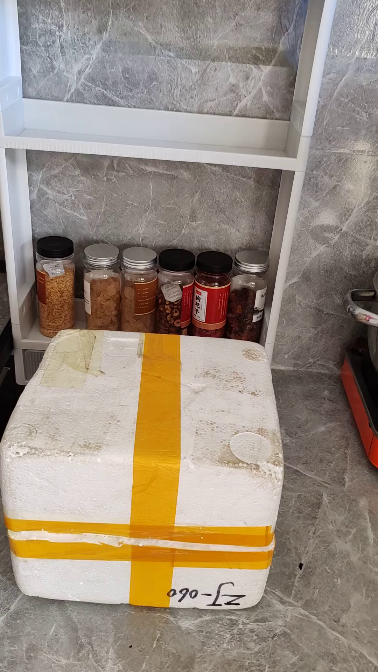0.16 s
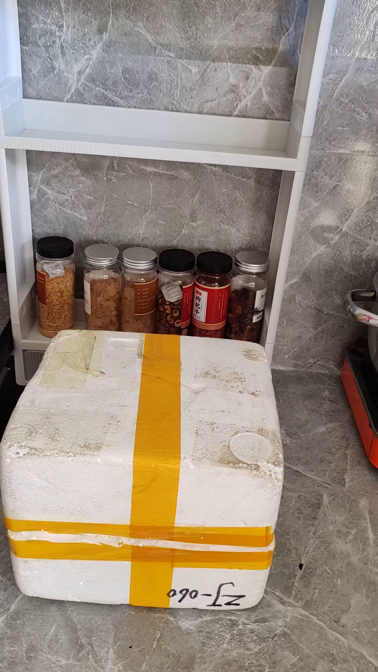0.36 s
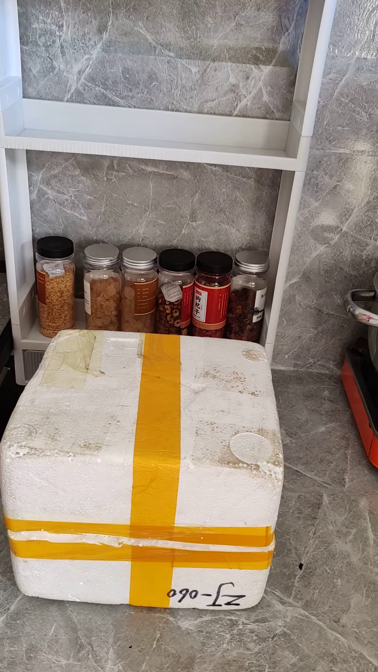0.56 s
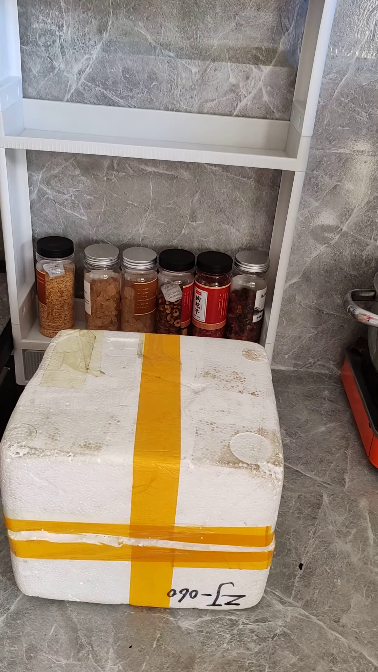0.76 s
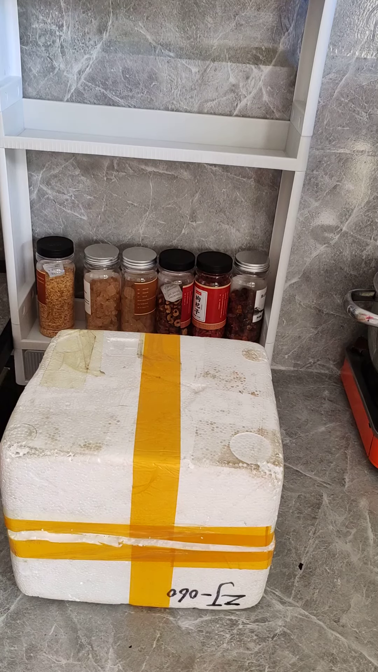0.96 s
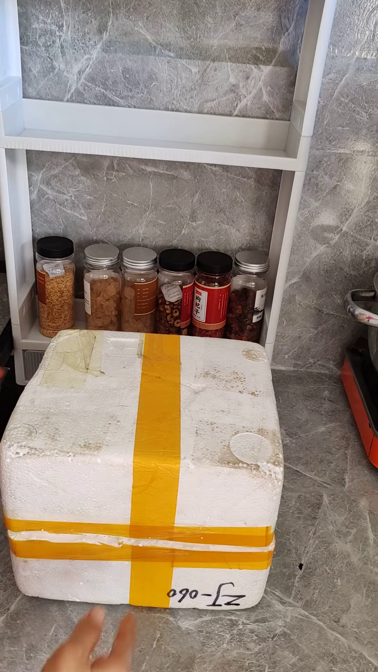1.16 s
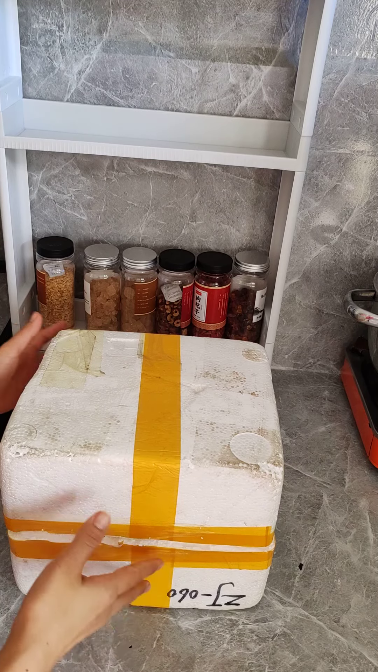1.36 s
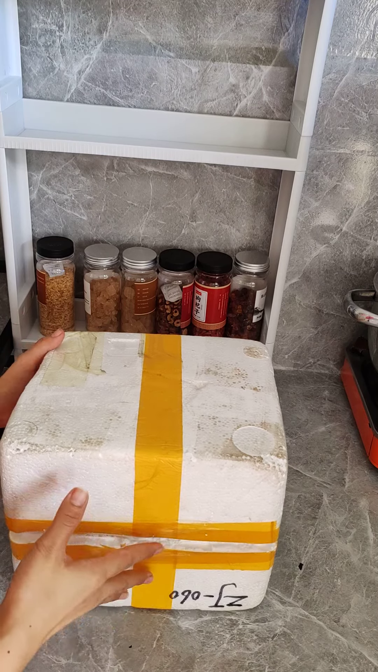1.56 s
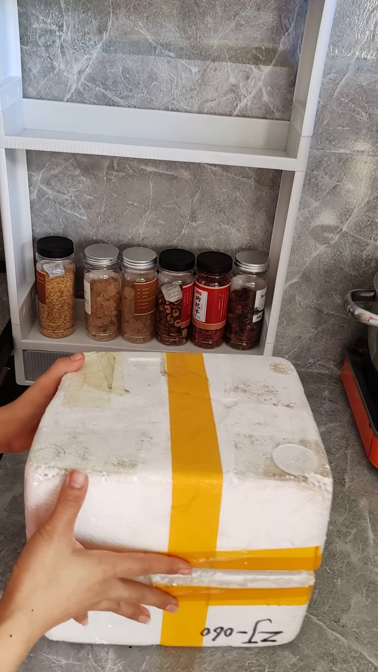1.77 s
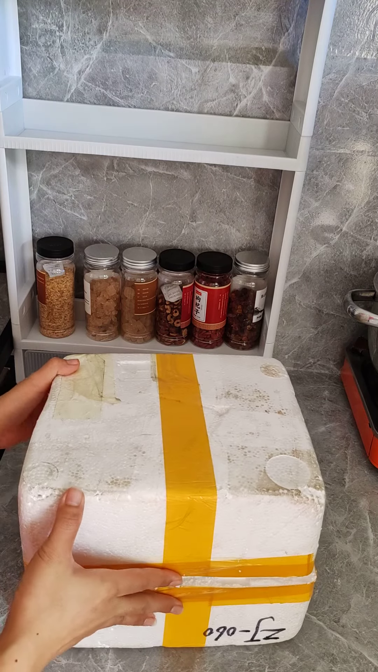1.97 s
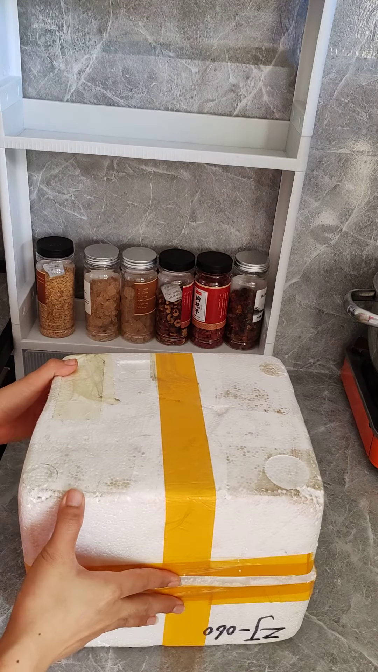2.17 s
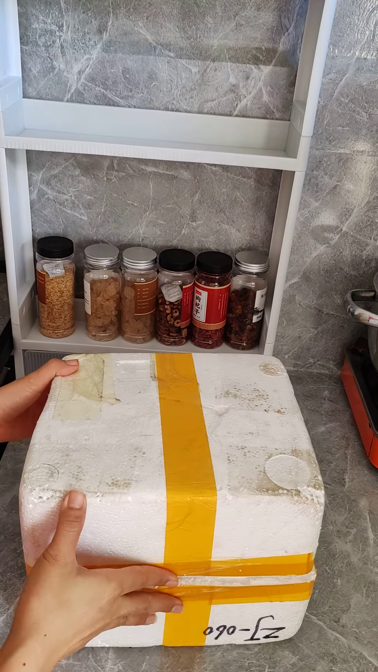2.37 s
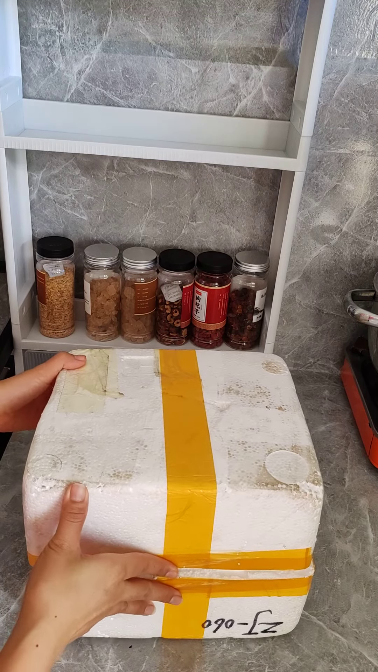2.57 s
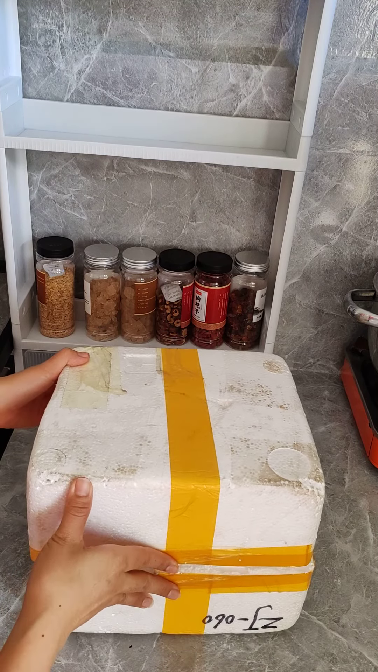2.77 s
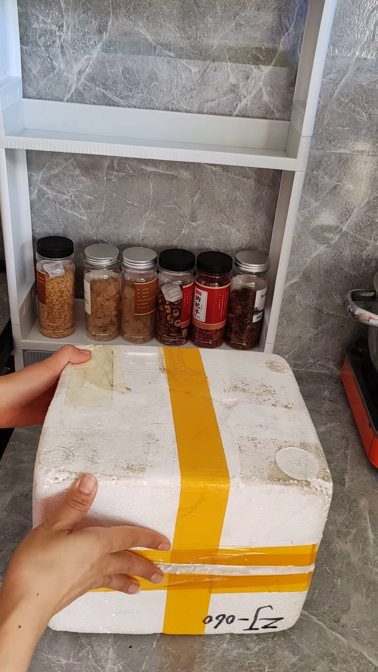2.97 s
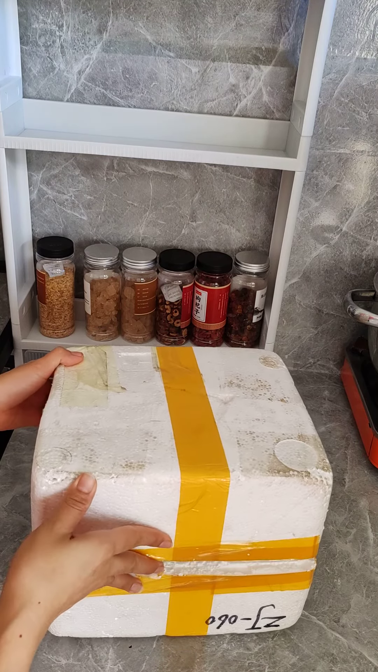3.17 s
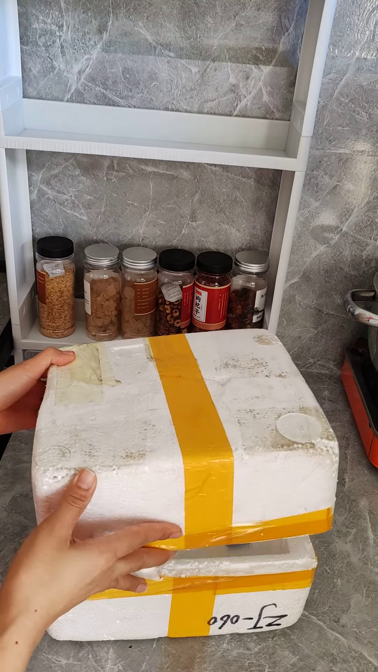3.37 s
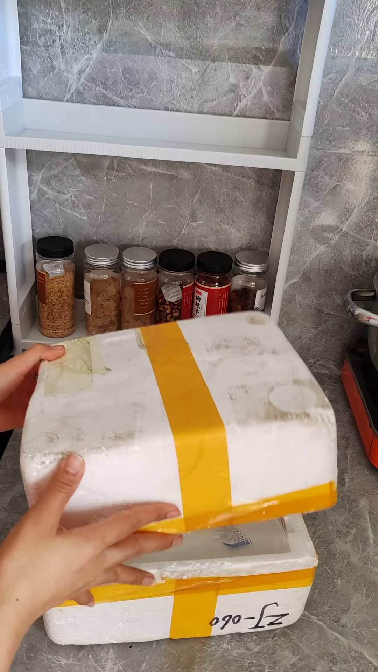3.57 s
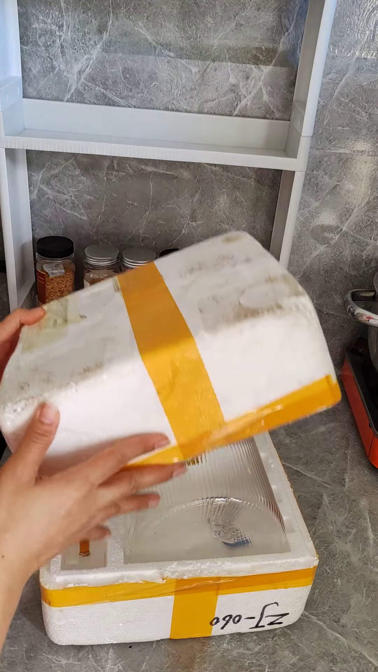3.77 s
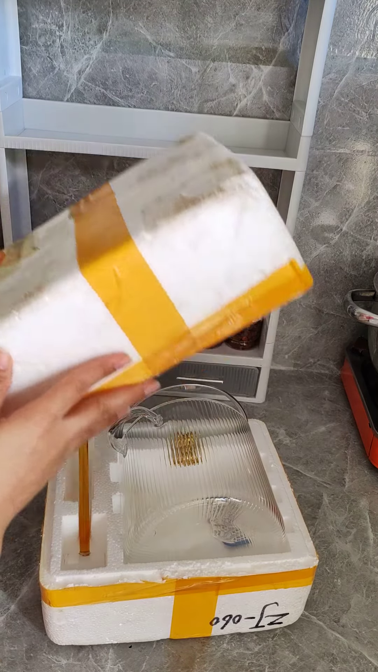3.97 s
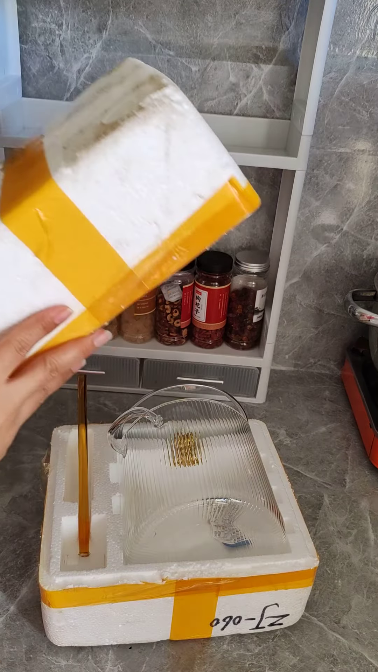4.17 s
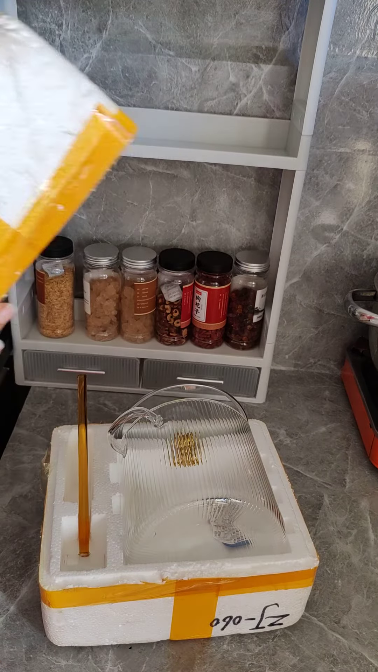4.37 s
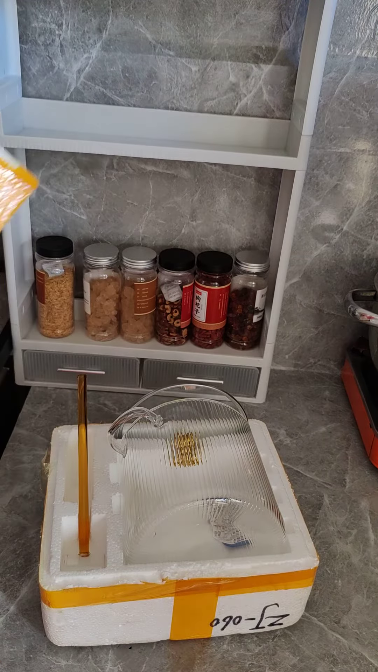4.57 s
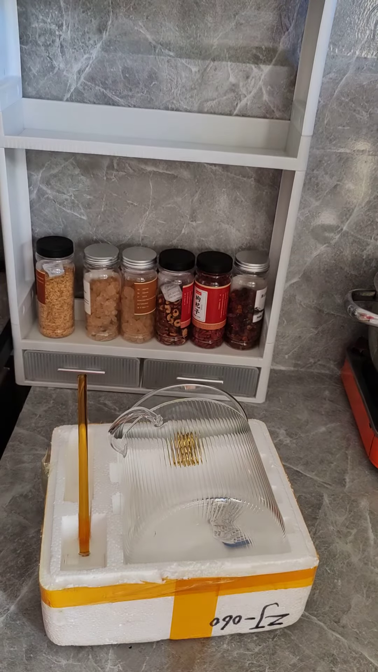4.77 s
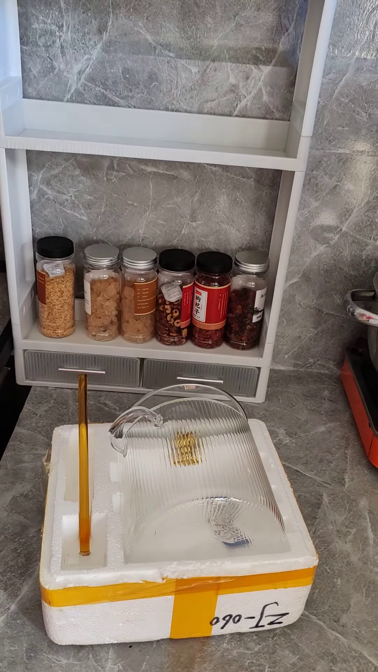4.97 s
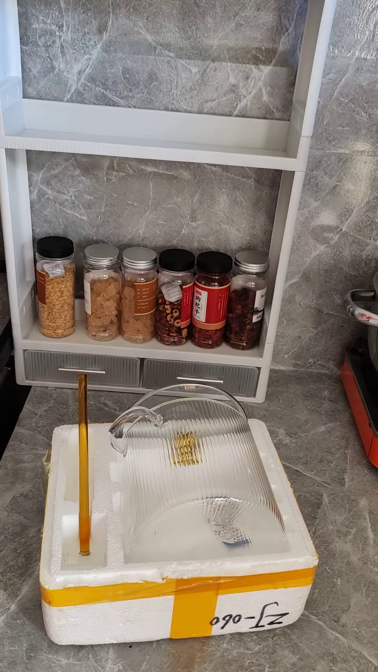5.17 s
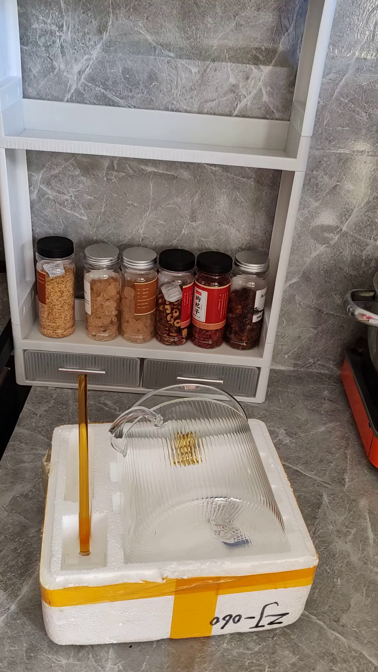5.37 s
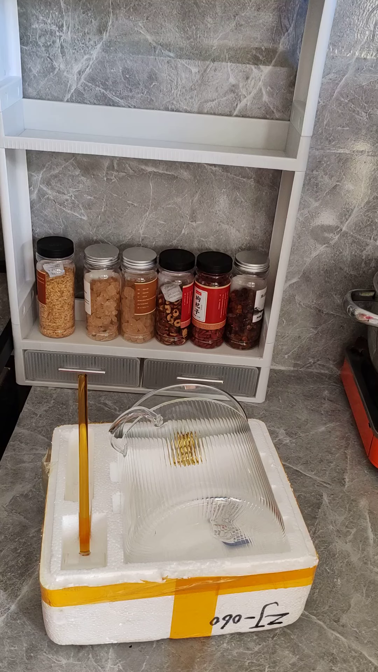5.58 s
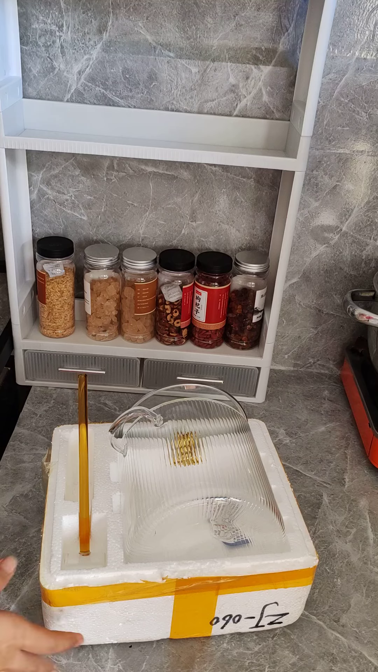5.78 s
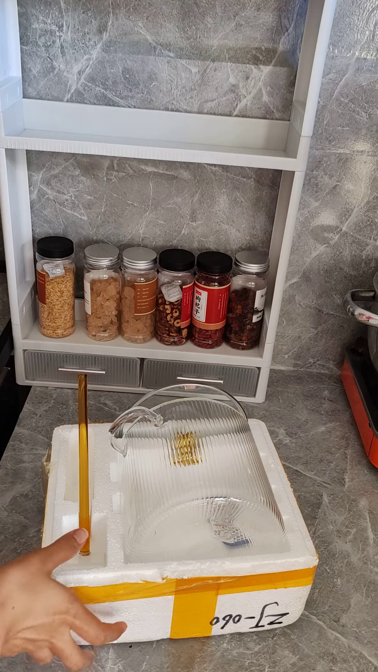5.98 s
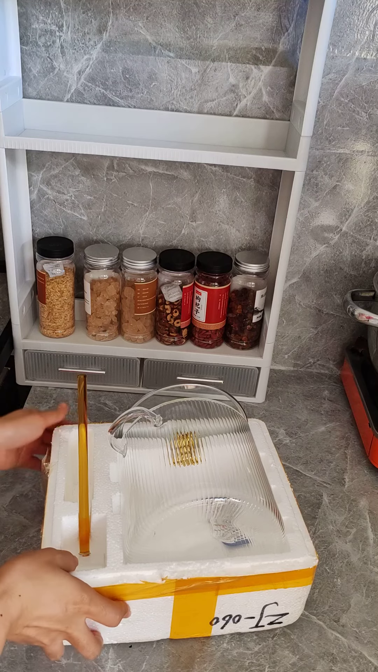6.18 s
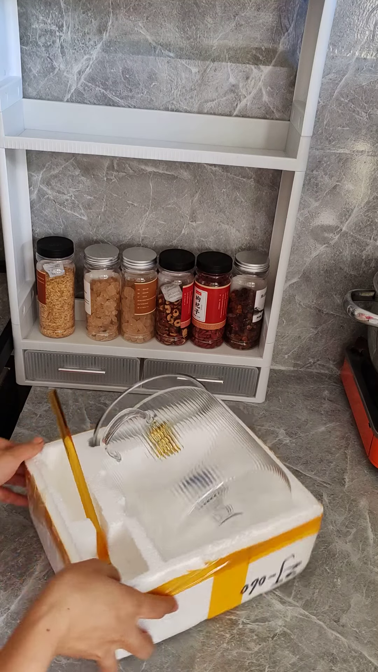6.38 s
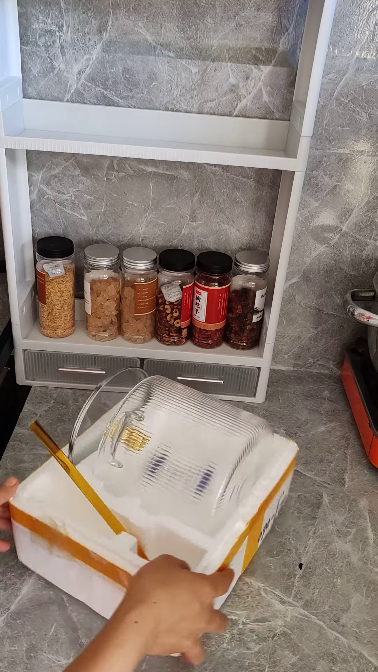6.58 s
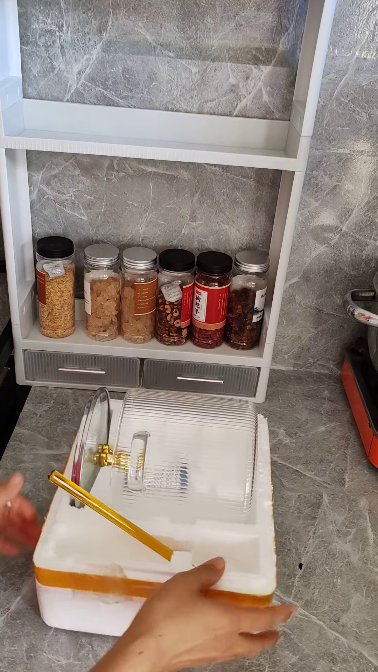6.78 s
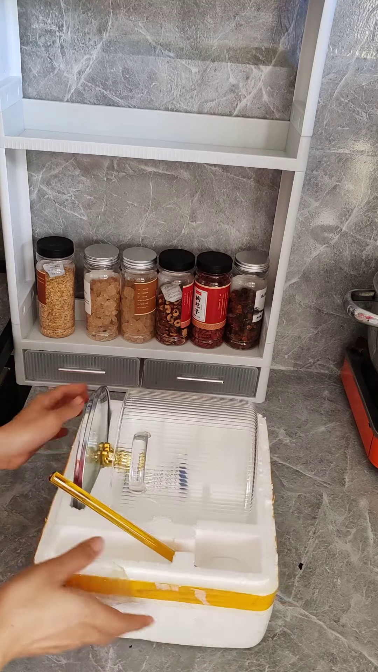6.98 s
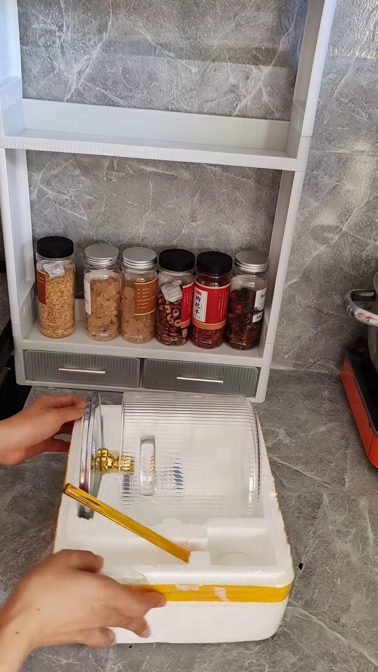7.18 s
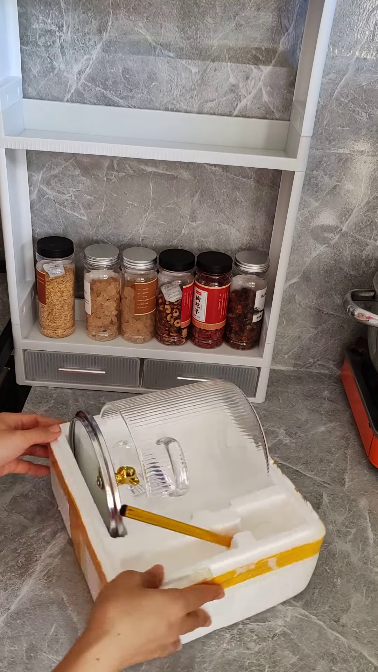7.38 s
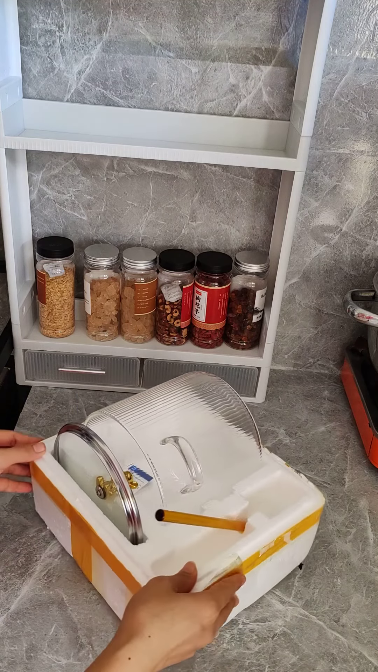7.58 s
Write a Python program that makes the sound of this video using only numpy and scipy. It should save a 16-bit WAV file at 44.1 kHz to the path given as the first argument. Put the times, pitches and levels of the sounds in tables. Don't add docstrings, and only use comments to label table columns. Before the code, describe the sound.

Close in a hard-walled kitchen, faint sleeve rustle comes before hands grip a foam box. It thumps, scrapes and judders on the stone counter while tape ticks. The tight lid rubs loose with short squeaks and one sharp, chattering high squeal. Light brushes follow, the lid lands a little further off, then the base is turned with gritty scraping and low creaks. A phone microphone catches low room rumble beneath.

```python
import sys
import numpy as np
from scipy import signal
from scipy.fft import rfft, irfft, next_fast_len
from scipy.io import wavfile
from scipy.ndimage import uniform_filter1d, map_coordinates

SR = 44100
rng = np.random.default_rng(int(sys.argv[2]) if len(sys.argv) > 2 else 0)


def voltage_ratio(decibels):
    exponent = np.asarray(decibels, float) / 20
    return 10 ** exponent


def digitize_waveform(pressure):
    field = np.atleast_2d(pressure).T
    bounded = np.clip(field, -1, 1)
    quanta = np.round(bounded * 32767).astype(np.int16)
    wavfile.write(sys.argv[1], SR, quanta)


N = 336483
TOP_HZ = 15950


def unit(x):
    return x / np.sqrt(np.mean(x ** 2) + 1e-20)


def along(points, hz):
    f, v = np.transpose(points)
    return np.interp(np.log(hz + 1), np.log(f + 1), v)


def filtered(x, response):
    m = next_fast_len(x.shape[-1] + 8192)
    return irfft(rfft(x, m) * response(np.fft.rfftfreq(m, 1 / SR)), m)[..., :x.shape[-1]]


def resonant(modes):
    def response(f):
        return sum((-1) ** k * voltage_ratio(db) * 1j * f * width / (centre * centre - f * f + 1j * f * width)
                   for k, (centre, width, db) in enumerate(modes))
    return response


def wobble(rate, size=N):
    knots = rng.standard_normal(int(size / SR * rate * 1.1) + 9)
    return map_coordinates(knots, [np.arange(size) * rate / SR])


def add(track, s, sound):
    part = track[..., round(s * SR):][..., :sound.shape[-1]]
    part += sound[..., :part.shape[-1]]


def swell(length):
    u = np.linspace(0, 1, round(length * SR))
    return u, np.sin(np.pi * u ** 0.6) ** 0.42


def glide(u, first_hz, last_hz, unsteady):
    return np.cumsum((first_hz + (last_hz - first_hz) * u) * (1 + unsteady)) / SR


def apart(pair, lag):
    return filtered(pair, lambda hz: np.exp(1j * np.pi * hz * lag * np.array([[-1], [1]])))


# f/Hz, left-right correlation
ALIKE = [(60, 0.92), (180, 0.9), (400, 0.92), (700, 0.18), (1650, 0.1), (5000, 0.088), (15000, 0.062)]


def paired(pair, colour):
    def response(hz):
        alike = along(ALIKE, hz) * [[1], [-1]]
        return voltage_ratio(along(colour, hz)) * np.sqrt((1 + alike) / 2)
    mid, side = filtered(pair, response)
    return np.array([mid + side, mid - side])


def rush(spectrum, grain=1, patchy_db=2, size=N):
    z = signal.stft(grain * rng.standard_normal((2, size)), nperseg=1024)[2]
    field = uniform_filter1d(rng.standard_normal(z.shape[1:]), size=4, axis=0)
    field = uniform_filter1d(field, size=10, axis=1)
    patchy = signal.istft(z * voltage_ratio(patchy_db * unit(field)), nperseg=1024)[1][:, :size]
    return unit(paired(patchy, spectrum))


def stroked(rows, layers, haste=1):
    power = np.zeros((len(layers), N))
    over_db, slope, release = np.transpose(layers)[..., None]
    for s, rise, hold, db, bright_db in rows:
        t = np.arange(round((rise + hold + .5) * SR)) / SR
        fall_db = haste * release * np.clip(t - rise - hold, 0, None)
        attack = np.clip(t / rise, 0, 1) ** 2.2
        add(power, s, attack * voltage_ratio(2 * (db + over_db + slope * bright_db - fall_db)))
    return power


# f/Hz, level/dB per Hz
DEEP = [(22, -53), (32, -25), (42, 0), (50, -2.5), (62, -9.5), (80, -15.5), (110, -18), (200, -120)]
AIR = [(50, -37), (133, -5), (185, -11.5), (269, -4.5), (340, -13), (1200, -19.5), (6460, -48),
       (19800, -120)]
# t/s, half length/s, level/dB
SURGES = [(0.347, 0.27, -53), (0.766, 0.06, -52), (1.035, 0.13, -51), (1.79, 0.55, -53),
          (2.25, 0.26, -43.5), (2.62, 0.14, -47), (2.998, 0.087, -45.5), (3.303, 0.22, -55.5),
          (3.914, 0.039, -55), (4.243, 0.075, -49), (4.804, 0.13, -49), (5.165, 0.054, -52),
          (5.374, 0.037, -47.5), (5.624, 0.084, -40), (5.866, 0.056, -41.5), (6.09, 0.057, -45),
          (6.457, 0.17, -46), (6.893, 0.41, -48.5), (7.55, 0.091, -44.5)]


def house():
    calm_db, air_db = -62, -56.5
    t = np.linspace(0, N / SR, 2000)
    power = voltage_ratio(calm_db) ** 2
    power = power + sum(voltage_ratio(db) ** 2 * np.exp(-((t - s) / half) ** 2) for s, half, db in SURGES)
    surge = np.interp(np.arange(N) / SR, t, np.sqrt(power))
    return apart(surge * rush(DEEP) + voltage_ratio(air_db) * rush(AIR), lag=0.00035)


# f/Hz, t60/s
KITCHEN = [(200, 0.58), (1000, 0.47), (4000, 0.71), (12000, 0.31)]


def kitchen(x):
    hz, t, z = signal.stft(rng.standard_normal((2, SR)), SR, nperseg=256)
    decay = voltage_ratio(-60 * t / along(KITCHEN, hz)[:, None])
    tail = paired(signal.istft(z * decay, SR, nperseg=256)[1], [(100, 0)])
    tail = tail * np.clip(np.arange(tail.shape[1]) / SR / 0.0084, 0, 1)
    return signal.fftconvolve(x.mean(0)[None], tail / np.linalg.norm(tail[0]), axes=1)[:, :N]


# t/s, rise/s, hold/s, pressure level/dB, brightness/dB
SLEEVE = [
    (.2, 0.12, 0.049, -58.5, -2.5),
    (.33, 0.033, 0.013, -32, -14),
    (.517, 0.025, 0.0055, -48, -1.5),
    (.68, 0.089, 0.043, -71.5, 1.5),
    (.85, .05, 0.39, -63, -28),
    (1.42, .09, .03, -37, -16),
]
# level/dB, slope/(dB per dB of brightness), release/(dB/s)
CLOTH = [(-.2, 1.7, 108), (.2, 5.5, 54)]
# f/Hz, level/dB per Hz
FOLD = [(710, -40), (1580, -0.5), (2420, -10), (3300, -8), (5200, -15), (11400, -120)]
SWISH = [(3060, -10), (5200, -7), (6650, -1), (7350, -13), (10100, -46), (17200, -120)]


def sleeve():
    early = 2 * SR
    fold, swish = np.sqrt(stroked(SLEEVE, CLOTH)[:, :early])
    cloth = fold * rush(FOLD, size=early) + swish * rush(SWISH, size=early)
    return np.pad(cloth, ((0, 0), (0, N - early)))


# t/s, level/dB, f/Hz, t60/s
THUDS = [(1.585, -34.5, 182, 0.064), (2.008, -15.5, 205, 0.048), (2.058, -36, 127, 0.069),
         (3.218, -32, 285.5, 0.075), (3.499, -43.5, 106, 0.12), (5.489, -32.5, 123, 0.23),
         (5.488, -34.5, 212.5, 0.18), (6.366, -28, 304, 0.037), (7.199, -38, 366, 0.17),
         (7.603, -25.5, 400, 0.16), (5.488, -18.5, 561, 0.068), (2.88, -25, 314, 0.085)]


def thuds():
    out, t = np.zeros(N), np.arange(SR // 4) / SR
    for s, db, hz, t60 in THUDS:
        phase = 2 * np.pi * hz * np.cumsum(1 + 0.063 * wobble(40, size=len(t))) / SR
        add(out, s, voltage_ratio(db - 60 * t / t60) * (1 - np.exp(-t / 0.003)) * np.sin(phase))
    return out


# t/s, peak level/dB, colour f/Hz, broad part level/dB
TAPE = [(0.536, -48, 3240, -26), (1.602, -30.5, 6550, -12), (2.017, -21, 4430, -6),
        (2.253, -20.5, 3270, 12), (3.026, -25, 6550, -6), (3.342, -32.5, 4310, -19),
        (3.7298, -7, 5000, -8.5), (4.145, -40.5, 4290, .6), (4.613, -54, 6500, 0), (3.337, -42, 9000, 0),
        (2.989, -26, 2400, -3), (5.313, -49.5, 3280, -16), (5.415, -18, 3250, -9),
        (6.364, -29, 2030, -13.5), (6.736, -23, 1860, -3), (7.15, -50, 1320, -22), (7.189, -49, 3000, -3),
        (7.31, -29, 6200, -6), (6.19, -52, 3000, 3), (6.258, -52, 13000, -3), (7.335, -21, 1740, -6),
        (7.564, -19, 7600, -3), (1.654, -21.5, 6000, 2), (2.262, -27, 3230, -3), (2.459, -27, 2500, 3),
        (2.885, -26, 4500, 0), (3.513, -30, 900, -8), (1.677, -16, 2010, 3), (5.617, -18.5, 3000, 2),
        (7.322, -15.5, 5660, 1.2)]
# t/s, peak level/dB, colour f/Hz, knock level/dB
TAPS = [(1.579, -31.5, 990, -1.5), (1.586, -29.5, 1070, -3), (2.876, -24.5, 3000, 1.5),
        (2.94, -22, 4100, -8.5), (3.127, -17, 4430, -4), (4.324, -37, 6260, -3.5), (4.401, -35.5, 990, -2),
        (4.45, -38, 1120, -1.5), (4.372, -46, 1200, -4), (4.412, -37, 750, -6), (4.424, -33.5, 800, 3.5),
        (4.436, -34.5, 846, -0.5), (4.959, -37.5, 975, 3), (5.492, -19, 2720, 2.5), (7.198, -40, 1380, -1),
        (7.59, -34, 899, -2.5), (7.601, -14.5, 1680, -8.5)]
# f/Hz, width/Hz, level/dB
BOX = [(398, 370, -3.5), (674, 410, 1), (1100, 100, -3), (1485, 190, -17)]


def ticks():
    snaps, t = np.zeros(N), np.arange(SR // 20) / SR
    events = [(s, db, hz, broad_db, -33) for s, db, hz, broad_db in TAPE]
    events += [(s, db, hz, -11 + 9 * np.log2(hz / 2000), knock_db) for s, db, hz, knock_db in TAPS]
    broad = resonant([(4000, 9000, 0)])
    for s, db, hz, broad_db, knock_db in events:
        crackle = rng.standard_normal(len(t)) * voltage_ratio(-60 * t / .016)
        panel = resonant([(hz, .4 * hz, 0)])
        snap = 1.6 * filtered(crackle, lambda f: panel(f) ** 2)
        snap += voltage_ratio(broad_db) * filtered(crackle, lambda f: broad(f) / (1 + 1j * f / 9000) ** 2)
        knock = filtered(crackle * voltage_ratio(-60 * t / .03), resonant(BOX))
        add(snaps, s, voltage_ratio(db) * snap / np.abs(snap).max())
        add(snaps, s, voltage_ratio(db + knock_db) * knock / np.abs(knock).max())
    return snaps


# t/s, length/s, f/Hz, width/Hz, level/dB
MOANS = [(.95, .2, 2760, 150, -69), (1.262, .02, 4500, 800, -67), (1.468, .04, 3250, 500, -62),
         (1.517, .06, 3150, 500, -60), (.35, .09, 1800, 400, -60), (5.415, .04, 3300, 700, -31),
         (7.148, .03, 1300, 700, -52), (3.34, .02, 4300, 900, -42), (1.843, .04, 2200, 900, -27),
         (2.21, .015, 800, 300, -44), (2.261, .14, 1630, 450, -34), (2.259, .12, 3360, 600, -36),
         (2.34, .07, 620, 200, -43), (2.04, .04, 620, 300, -30), (2.885, .03, 2400, 600, -32),
         (3.005, .13, 2340, 200, -38), (3.379, .035, 12000, 4000, -30), (3.025, .016, 6600, 1200, -31),
         (5.425, .012, 3150, 600, -27), (5.616, .012, 2700, 500, -30), (5.008, .05, 3650, 250, -59),
         (5.02, .05, 2000, 200, -58), (5.43, .05, 1300, 300, -39), (3.72, .2, 10500, 3500, -30),
         (2.884, .028, 4800, 1200, -35), (3.399, .045, 2850, 600, -19), (3.415, .05, 1900, 900, -28),
         (3.485, .07, 2600, 500, -34), (3.745, .12, 4600, 700, -22), (3.81, .13, 3950, 700, -27),
         (3.83, .12, 4650, 900, -31), (4.33, .1, 470, 120, -58), (4.62, .3, 468, 100, -58),
         (4.96, .12, 470, 120, -58), (5.008, .08, 4700, 250, -56), (5.313, .11, 3300, 400, -58),
         (5.315, .1, 4600, 300, -64), (5.315, .1, 2500, 300, -63), (5.425, .06, 1850, 300, -33),
         (5.485, .09, 2550, 250, -33)]


def moans():
    fade_db, attack_s = -10, 0.0012
    out = np.zeros((2, N))
    for s, length, hz, width_hz, db in MOANS:
        t = np.arange(round(length * SR)) / SR
        shape = voltage_ratio(db + fade_db * t / length) * (1 - np.exp(-t / attack_s)) * np.sqrt(1 - t / length)
        for port in out:
            band = sum(wobble(width_hz, size=len(t)) * turn(2 * np.pi * hz * t) for turn in (np.sin, np.cos))
            add(port, s, shape * band)
    return out


# t/s, length/s, burst rate/Hz, first f/Hz, last f/Hz, level/dB
CHATTERS = [
    (3.7295, .013, 250, 4900, 6500, -8),
    (3.7425, .031, 205, 4700, 4500, -12),
]


def chatters():
    out = np.zeros((2, N))
    for s, length, rate, first_hz, last_hz, db in CHATTERS:
        u = np.linspace(0, 1, round(length * SR))
        since = np.cumsum(rate * (1 + .12 * wobble(150, size=len(u)))) / SR % 1
        burst = np.exp(-2.5 * since) * np.clip(12 * since, 0, 1) * np.clip(8 * (1 - u), 0, 1)
        phase = 2 * np.pi * glide(u, first_hz, last_hz, .05 * wobble(900, size=len(u)))
        for port in out:
            strength = voltage_ratio(db + 1.8 * wobble(300, size=len(u))) * burst
            tone = np.sin(phase + .5 * wobble(200, size=len(u))) + voltage_ratio(-14) * np.sin(2 * phase)
            add(port, s, strength * tone)
    return out


# t/s, length/s, first f/Hz, last f/Hz, level/dB
SQUEAKS = [(2.272, 0.015, 1650, 1600, -34), (2.662, .014, 1700, 1800, -33), (2.675, .012, 2050, 2150, -31),
           (3.399, .01, 2750, 2900, -19), (3.41, .012, 3000, 2800, -18), (2.98, .009, 2350, 2400, -25),
           (2.987, .012, 2420, 2440, -13), (3.001, .008, 2400, 2350, -22), (3.011, .014, 2380, 2340, -28),
           (3.027, .013, 2330, 2340, -26), (3.044, .014, 2380, 2330, -30), (3.068, .012, 2400, 2400, -33),
           (3.082, .028, 2340, 2380, -35), (3.711, 0.018, 4350, 4700, -12),
           (3.704, 0.0083, 4100, 4300, -20), (3.773, 0.023, 8100, 7700, -19.5),
           (3.389, 0.015, 5050, 5300, -22), (3.798, .009, 3700, 3720, -15), (3.785, .007, 3900, 5100, -17),
           (3.79, 0.007, 4300, 4800, -18), (3.806, .012, 5100, 8800, -23.5),
           (3.808, 0.017, 4000, 4100, -23), (5.415, .005, 3350, 3258, -17), (5.415, .006, 8300, 8200, -33)]
SQUEALS = [(2.014, .012, 2200, 5500, -26), (3.389, 0.011, 2800, 2610, -21.5),
           (3.397, 0.025, 2750, 2975, -22), (3.661, 0.022, 1243, 1265, -15),
           (3.678, 0.016, 1400, 2040, -21), (3.687, 0.02, 2750, 2850, -11.5),
           (3.379, .008, 4834, 2795, -25), (3.704, 0.01, 3010, 3497, -19.5),
           (3.708, 0.015, 4210, 4700, -22.5), (3.794, 0.011, 3600, 3644, -14.5),
           (3.718, 0.01, 4600, 4760, -21)]


def squeaks():
    port_turn = .6

    def rim(f):
        return f / np.hypot(f, 2200) / np.hypot(1, (f / 9500) ** 2)

    out = np.zeros((2, N))
    slips = [(*row, -21) for row in SQUEAKS] + [(*row, -4) for row in SQUEALS]
    for s, length, first_hz, last_hz, db, step_db in slips:
        u, shape = swell(length)
        phase = 2 * np.pi * glide(u, first_hz, last_hz, .025 * wobble(600, size=len(u)))
        start = 2 * np.pi * rng.random(9)
        partials = [k for k in range(9) if (k + 1) * max(first_hz, last_hz) < TOP_HZ]
        for port, side in zip(out, (1, -1)):
            tone = 0
            for k in partials:
                strength = voltage_ratio(step_db * k - .15 * k * k + 2.6 * wobble(350, size=len(u)))
                tone = tone + strength * np.sin((k + 1) * phase + start[k] + side * port_turn * (-1) ** k)
            add(port, s, voltage_ratio(db) * shape * filtered(tone, rim))
    return out


# t/s, length/s, first rate/Hz, last rate/Hz, level/dB
JUDDERS = [(1.838, 0.034, 551, 470, -29.5), (2.009, 0.088, 188.4, 212, -32),
           (2.458, 0.026, 216, 207, -23.5), (2.474, 0.042, 207.6, 199.4, -16.5),
           (2.507, 0.071, 204.3, 206, -36.5), (2.596, 0.028, 621, 596, -25), (2.643, .02, 820, 854, -32.5),
           (2.657, 0.033, 845, 798, -22.5), (2.877, 0.048, 259.8, 228, -21.5),
           (3.402, 0.055, 522, 419.4, -28.5), (5.483, 0.048, 244.5, 222.5, -36.5),
           (6.802, 0.034, 340.5, 338, -26), (6.828, 0.034, 351.2, 379.6, -17.5),
           (6.858, .04, 379, 384, -29.5), (7.594, 0.04, 306.4, 276, -28.5)]
# f/Hz, width/Hz, level/dB
LID = [(415, 260, -1), (710, 390, 0), (1350, 400, -13.5)]
BASE = [(358, 270, -5), (690, 240, 1), (1135, 150, -1.5), (1400, 270, -7.5)]


def judders():
    thumps, rasps = np.zeros((2, N)), np.zeros(N)
    for s, length, first_hz, last_hz, db in JUDDERS:
        on_base = int(s > 6)
        rasp_db = -5 + 4 * np.log2(first_hz / 300) - 6 * on_base
        u, shape = swell(length)
        turns = glide(u, first_hz, last_hz, .05 * wobble(150, size=len(u)))
        slips = np.diff(np.floor(turns), prepend=0) * voltage_ratio(1.1 * rng.standard_normal(len(u)))
        gate = np.exp(-6 * (turns % 1))
        add(thumps[on_base], s, voltage_ratio(db + 12) * shape * unit(slips))
        add(rasps, s, voltage_ratio(db + rasp_db) * shape * unit(gate * rng.standard_normal(len(u))))
    walls = filtered(thumps, lambda f: np.array([resonant(LID)(f), resonant(BASE)(f)])).sum(0)
    return walls + filtered(rasps, resonant([(2264, 830, 0.097), (4750, 1500, -1.4)]))


TUGS = [(1.58, 0.004, 0.01, -40.5, -9), (1.6, .003, .006, -47.5, 2), (1.84, 0.0067, 0.015, -25.5, -2),
        (2.012, 0.0044, 0.044, -30.5, -3), (2.258, 0.0028, 0.037, -45, 8), (2.34, 0.016, 0.12, -48, -5),
        (2.457, 0.015, 0.0044, -26, -4.5), (2.876, 0.004, 0.039, -31.5, -8), (2.935, .005, 0.04, -35, -5),
        (3.0, 0.0056, 0.037, -38, 1.5), (3.13, 0.0042, 0.027, -43, -2.5), (3.3, 0.053, 0.0043, -44, -5.5),
        (3.49, 0.017, 0.011, -41.5, -1), (3.401, 0.0047, 0.03, -25.5, -4), (3.662, 0.0079, 0.02, -34, 13.5),
        (3.7, 0.022, 0.095, -41.5, 19.5), (5.415, 0.002, 0.025, -36.5, 5.5),
        (2.52, 0.065, 0.075, -32.5, 0.5), (2.58, 0.082, 0.097, -36.5, -2.5)]
SLIDES = [(1.654, 0.003, 0.19, -40.5, -4), (1.713, 0.11, .006, -33.5, -0.5),
          (1.887, 0.031, 0.13, -39.5, 2.5), (3.374, 0.015, 0.023, -33, 10),
          (6.74, 0.049, 0.045, -39.5, -11), (6.363, 0.0027, 0.02, -38, -5.5),
          (6.374, 0.048, 0.51, -37.5, 2), (6.702, 0.041, 0.13, -37.5, 1.5), (7.197, .003, 0.027, -44, -6.5),
          (7.23, 0.07, .02, -39.5, 2.5), (7.326, .006, 0.014, -33, 3), (7.34, .025, 0.2, -39, 2.5),
          (7.56, 0.049, .03, -31, -3.5)]
BRUSHES = [(3.989, 0.15, 0.2, -65.5, -6), (4.322, .003, 0.01, -56, 2.5), (4.355, .004, .02, -61, -3),
           (4.399, 0.0027, 0.025, -45, 0.5), (4.66, 0.022, 0.048, -53, -3.5),
           (4.784, 0.032, 0.095, -57.5, -1.5), (4.958, 0.0016, 0.0081, -49, -2),
           (5.27, 0.03, .004, -69, -9), (5.313, 0.0029, 0.0036, -57.5, -5.5), (5.338, 0.014, .06, -76, -6),
           (5.0, 0.013, 0.042, -61.5, -3), (5.12, 0.031, 0.018, -72, 0.5), (4.608, 0.007, .02, -60, -3.5),
           (6.165, 0.004, .005, -68, -6), (6.205, .005, 0.021, -59.5, -1.5), (6.3, 0.056, 0.043, -62, -9.5),
           (7.15, 0.023, 0.0095, -59, -6)]
SETTLES = [
    (5.44, .01, 0.046, -42.5, 1),
    (5.486, .004, 0.03, -34.5, -1.5),
    (5.52, 0.02, 0.22, -45, -5),
    (5.616, 0.002, 0.0087, -34.5, -2),
    (5.66, 0.019, 0.057, -50, 1.5),
    (3.9, .025, 0.23, -69, -10.5),
]
# level over pressure/dB, slope/(dB per dB of brightness), release/(dB/s)
LAYERS = [(-7, -0.99, 115.5), (-0.38, 0.1355, 131), (-0.26, 1.23, 166.5), (-10.5, 1.3931, 195.5)]
# f/Hz, level/dB per Hz
WALLS = [(88, -52.5), (150, -14), (334, -7), (401, -4.5), (602, 0.5), (1000, -3), (1300, -36), (2200, -120)]
SCRAPE = [(590, -33.5), (1000, -7.5), (1510, -1.5), (1850, -5), (2090, -2.5), (3400, -6.5), (4420, -36.5),
          (7480, -120)]
HISS = [(1700, -41), (2700, -14.5), (3600, -5), (6810, -5), (8500, -13), (11000, -40.5), (18700, -120)]
BEADS = [(5000, -31.5), (8500, 1), (10300, -6), (11400, -6.5), (14500, -9.5), (16000, -28.5)]


def rubbing(song):
    # strokes, haste of letting go, unevenness of grip, bead level/dB (sliding frees finer beads)
    kinds = [(TUGS, 0.89, 1.5, -2.5), (SLIDES, 1.33, .9, 3), (BRUSHES, 1.15, 1.1, 1), (SETTLES, 1.04, 1.2, -6)]
    power = np.array([stroked(strokes, LAYERS, haste) for strokes, haste, _, _ in kinds])
    for kind, (_, _, _, beads_db) in zip(power, kinds):
        kind[-1] *= voltage_ratio(beads_db) ** 2
    strongest = power.sum(1).argmax(0)
    grip = np.array([uneven for _, _, uneven, _ in kinds])[strongest]
    grain = voltage_ratio(grip * (.5 * wobble(40) + 0.8 * wobble(200) + 0.71 * wobble(900)))
    grain /= np.sqrt(np.abs(uniform_filter1d(grain ** 2, SR // 5)))
    singing = np.sqrt(np.abs(uniform_filter1d(song[0] ** 2, SR // 80)))
    locked = 1 / (1 + 6 * singing)
    layers = zip(np.sqrt(power.sum(0)), (WALLS, SCRAPE, HISS, BEADS))
    return locked * sum(gain * rush(colour, grain, patchy_db=2.3) for gain, colour in layers)


def scene():
    snaps, slips, bumps = ticks(), judders(), thuds()
    song = squeaks() + chatters() + moans()
    near = apart(np.array([snaps + slips] * 2), lag=1 / SR) + apart(np.array([bumps] * 2), lag=0.00031)
    soft = voltage_ratio(-12) * slips + voltage_ratio(-11.5) * song
    echo = kitchen(voltage_ratio(-1.0) * (snaps + bumps) + soft)
    return near + song + echo + rubbing(song) + sleeve() + house()


def band_limit(x):
    return signal.sosfilt(signal.butter(12, 16820, fs=SR, output="sos"), x)


def record(dry):
    opens_s, fade_s, left_treble_db = 0.1875, 0.037, 1.5
    opened = dry * np.clip((np.arange(N) / SR - opens_s) / fade_s, 0, 1) ** 2

    def ports(hz):
        tilt = voltage_ratio(left_treble_db * hz / TOP_HZ * [[1], [-1]])
        return np.where(hz < TOP_HZ, 1, voltage_ratio(-29.5)) * tilt

    return band_limit(filtered(opened, ports))


dry = scene()
out = record(dry)
digitize_waveform(out)
```